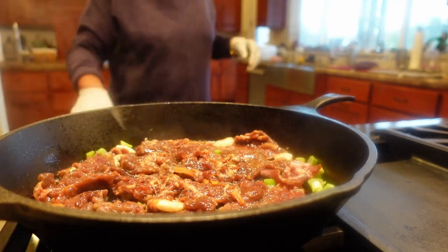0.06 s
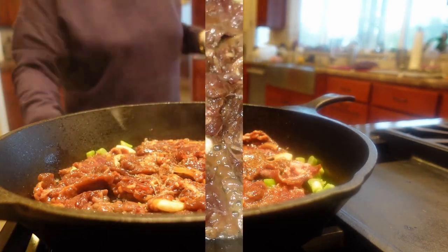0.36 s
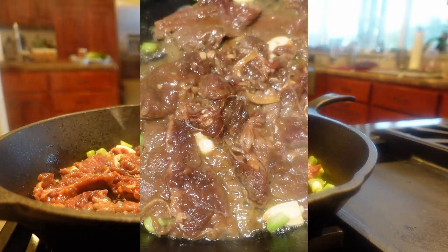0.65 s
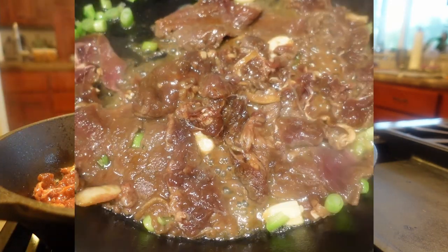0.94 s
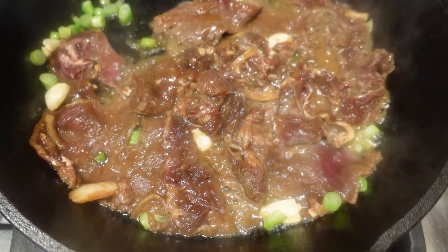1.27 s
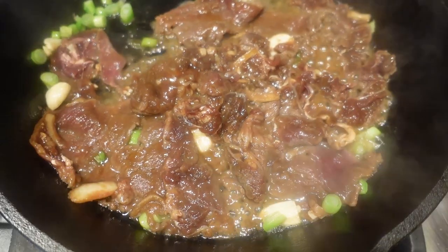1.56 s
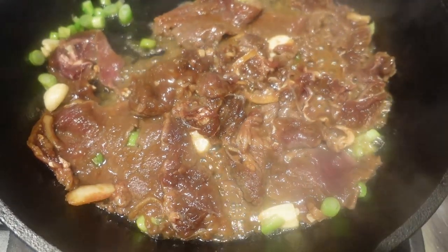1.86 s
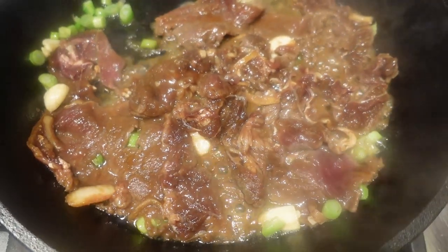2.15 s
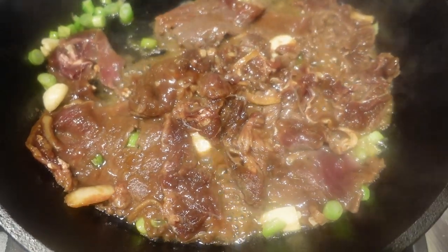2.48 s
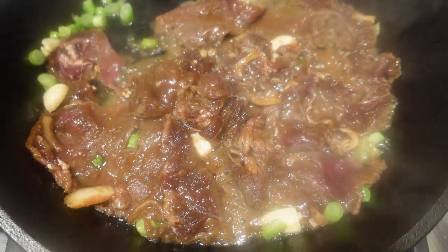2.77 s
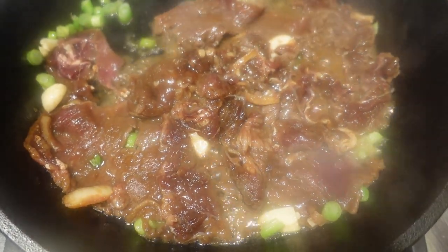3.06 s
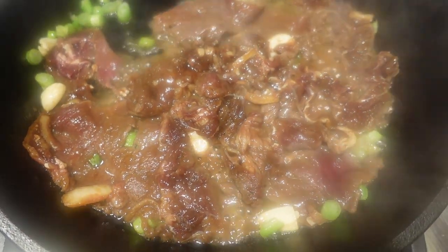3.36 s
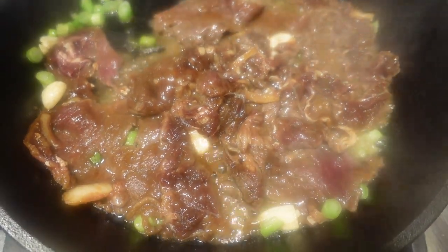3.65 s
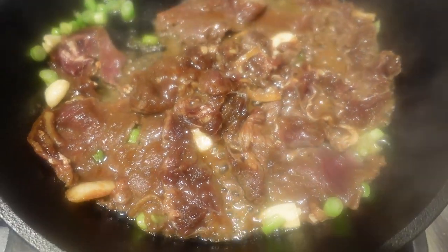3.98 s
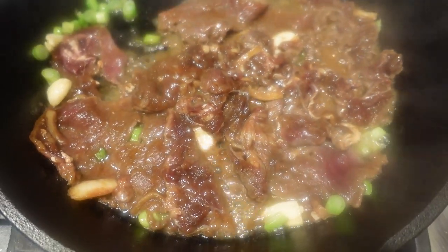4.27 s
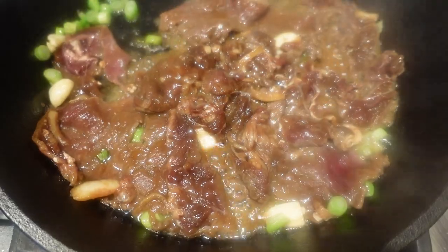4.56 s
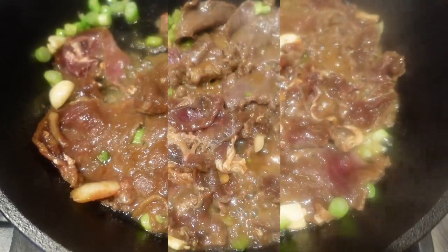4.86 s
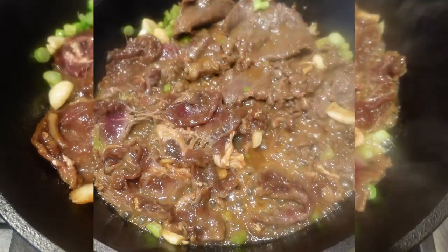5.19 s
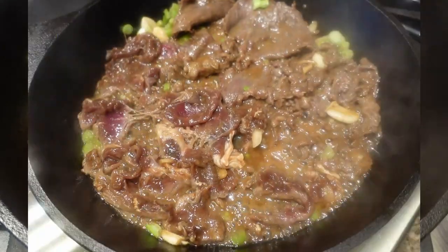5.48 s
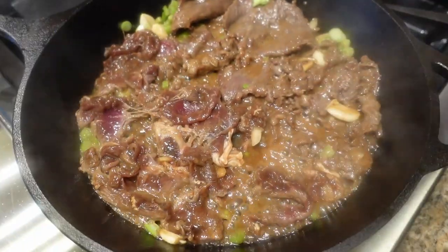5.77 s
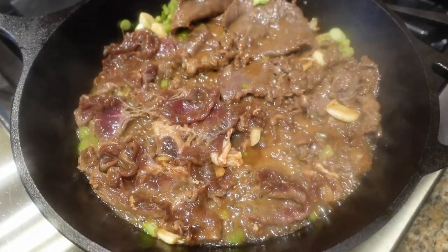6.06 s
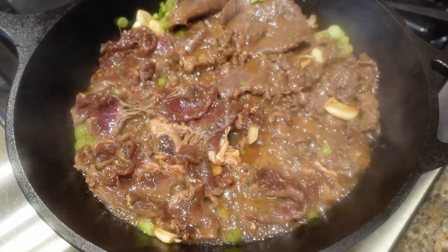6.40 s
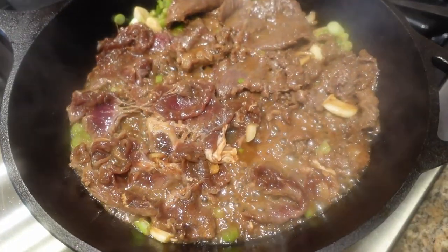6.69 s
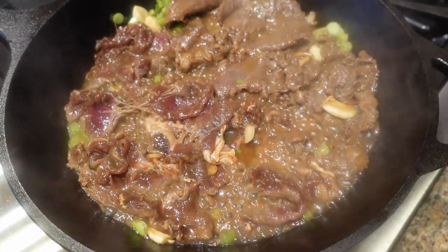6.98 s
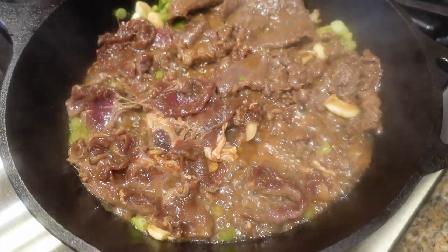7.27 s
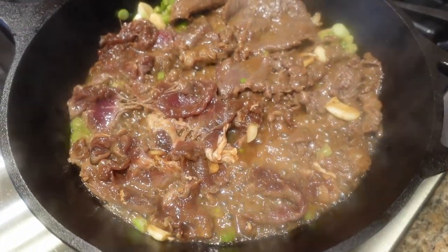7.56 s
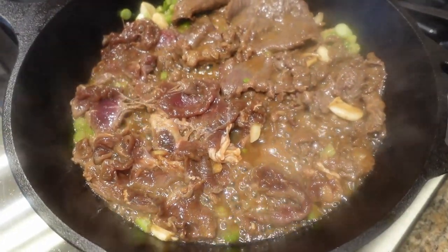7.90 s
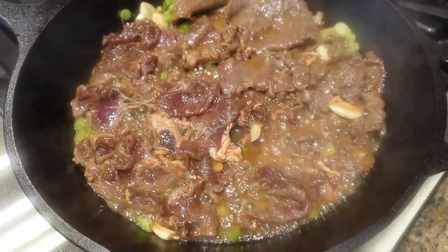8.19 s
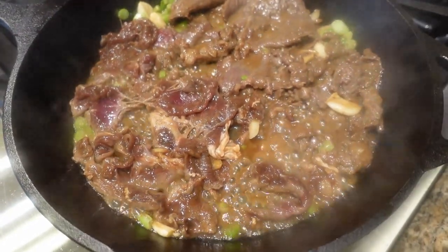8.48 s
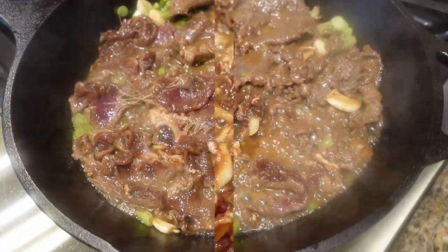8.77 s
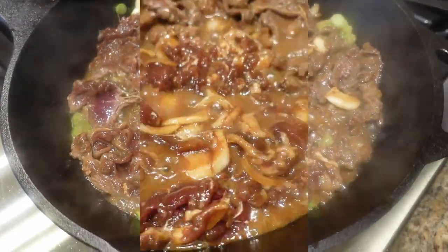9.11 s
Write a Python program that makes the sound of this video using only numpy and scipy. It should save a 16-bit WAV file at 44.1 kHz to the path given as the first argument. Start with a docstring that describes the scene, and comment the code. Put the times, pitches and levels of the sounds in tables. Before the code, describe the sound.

A kitchen vent fan whooshes and hums steadily while saucy meat fries in a pan, fizzing, crackling and softly bubbling.

```python
"""Marinated meat sizzles in a cast iron skillet under a running vent fan.
After a short silence we are suddenly beside the pan: tiny steam bubbles burst in the juice, larger
ones pop, juice spits on the hot iron and the sauce gurgles, while the fan whooshes and hums.
At about 5 s we move above the pan, where the hum is deeper.
In the last moment we jump to a third spot, where the sizzle is duller, and hear one wet splat."""
import sys
import numpy as np
from scipy import signal
from scipy.fft import rfft, irfft
from scipy.io import wavfile

SR = 44100
rng = np.random.default_rng(int(sys.argv[2]) if len(sys.argv) > 2 else 0)


def materialize(psi):
    """Save the field psi as 16-bit PCM at rate SR to the path in sys.argv[1].

    A 1-D psi becomes a single channel; in a 2-D psi each row is a channel.
    """
    bounded = np.clip(np.atleast_2d(psi).T, -1, 1)
    quanta = np.round(bounded * 32767).astype(np.int16)
    wavfile.write(sys.argv[1], SR, quanta)


N = 411940
T = np.arange(N) / SR
HZ = np.fft.rfftfreq(N, 1 / SR)
START_S, MOVE_S, LAST_SPOT_S = 0.8095, 5.147, 9.267
RISE_SAMPLES = 12  # a bubble's lead-in before its peak

# "Beside" and "above" are the two main listening spots; a sound that depends on them has a row for each.
# tone of the sizzle: (frequency [Hz], beside [dB], above [dB])
SIZZLE_TONE = [(40, -50, -50), (200, -14, -25), (606, -6, -2), (1410, -6, 0.8), (2400, -2, -1),
               (3300, -0.5, -2), (3750, -0.5, 0), (4900, -2.5, -4), (5900, -5, -4), (8050, -8.5, -5.5),
               (9900, -13, -12.5), (11900, -18.5, -17.5), (14000, -23.5, -23.5), (15700, -28.5, -26.5)]
# pitches the skillet boosts or weakens: (frequency [Hz], width [Hz], beside [dB], above [dB])
SKILLET_RESONANCES = [(2450, 190, -5, -3.5), (3020, 230, 4, 1.5), (4730, 97, -4, 1.5), (5070, 450, 3, 0.5)]
# slow trend of the frying as juice runs onto the iron: (time [s], vigour [steps])
VIGOUR_TREND = [(0.82, -1), (2.1, 0.5), (2.55, -1.2), (3.7, 0), (4.2, -0.5), (4.42, 1.5), (4.95, -1.5),
                (5.11, 1), (5.19, -3), (5.45, -1), (5.8, -0.9), (6.2, -1), (6.37, -2.5), (6.62, 0),
                (7.2, -1), (7.8, -0.9), (8.0, -0.5), (8.5, -1.7), (9.05, -0.4), (9.18, -4), (9.25, -2.5),
                (9.27, -5), (9.3, 0)]
# rise and fall of the sizzle's treble: (time [s], level [dB])
TREBLE_TREND = [(2.7, -0.3), (4.75, 2.0), (5.6, -0.9), (8.4, 0.5)]
# large bubbles that pop: (time [s], level [dB], pitch [Hz], ring time [ms])
BIG_BUBBLES = [(1.0101, -14.5, 4200, .25), (1.0367, -7.5, 6200, .12), (1.1778, -14, 3030, .5),
               (1.5258, -14, 6200, .15), (1.6378, -17, 7000, .1), (2.2404, -13, 4500, .1),
               (2.6038, -16, 6100, 1.3), (2.9488, -14, 5000, .2), (3.0168, -11, 3500, .25),
               (3.8572, -9.5, 4000, .3), (3.8845, -16, 6500, .14), (4.069, -14, 7500, .08),
               (4.6475, -7.5, 8500, .06), (4.7182, -20, 7000, 1.8), (5.1175, -17, 6000, .7),
               (5.1467, -18, 6300, 1.6), (5.266, -28, 12600, 1.5), (5.4736, -14, 9000, .12),
               (5.4739, -8.5, 2600, .14), (5.6281, -15, 6000, .2), (5.9056, -14, 6550, .15),
               (6.1326, -9, 3780, .7), (6.7749, -13, 7600, .33), (7.3029, -19, 7700, .4),
               (7.5692, -13.5, 5400, .15), (7.6838, -9.5, 4600, .14), (7.6843, -12, 7200, .2),
               (7.7637, -20, 6400, .9), (7.953, -16, 7400, .14), (8.0486, -15, 6700, .3),
               (8.2153, -8, 5900, .33), (8.26, -13, 1900, .1), (8.3485, -19, 11000, .25),
               (8.4141, -9, 5000, .11), (8.6245, -15, 6600, .5), (8.9458, -14, 6700, .18),
               (9.2969, -7.5, 2100, .27), (9.2975, -17, 5200, .25), (9.3025, -17, 2500, .7)]
# juice on bare iron; narrow spits ring: (time [s], level [dB], pitch [Hz], length [s], width [octaves])
JUICE_SPITS = [(1.155, -37, 3030, .07, .13), (1.667, -37, 3030, 0.078, .13), (1.863, -35, 5100, .05, 0.37),
               (2.03, -31, 4400, 0.049, .5), (2.353, -37, 7000, .03, .5), (2.85, -33, 3400, .045, .3),
               (2.987, -33, 3200, 0.05, .3), (3.275, -35, 6000, .03, .4), (3.43, -35, 3680, .07, 0.22),
               (3.817, -34, 4100, .02, .35), (3.854, -32, 4200, .017, .25), (4.28, -36, 3050, .06, .13),
               (4.537, -33, 4500, 0.031, .5), (4.835, -36, 8000, 0.027, .4), (5.018, -36, 4600, .025, .5),
               (5.1, -33, 4800, .036, .45), (6.188, -35, 5200, .03, .5), (6.27, -39, 9000, .035, .4),
               (6.77, -35.5, 7200, .055, .45), (6.94, -35.5, 5500, 0.038, .5), (7.122, -41, 8500, .025, .4),
               (7.548, -34.5, 5000, .03, .5), (7.676, -38, 8500, .025, .55),
               (7.938, -36, 3400, 0.081, 0.61), (8.008, -36, 5500, .05, .6), (8.213, -33, 5200, .04, .6),
               (8.652, -33, 5000, .025, .5), (9.232, -31.5, 4200, 0.029, 0.97), (9.279, -28, 2500, .04, .7),
               (9.289, -34, 5000, 0.027, .2)]
# tone of the bubbles breaking in the sauce: (frequency [Hz], beside [dB], above [dB])
SAUCE_TONE = [(40, -95, -95), (780, -52, -54), (1060, -45, -38.5), (1300, -44, -38), (1560, -50, -35),
              (2020, -57, -36.5), (2370, -60, -42.5), (4000, -75, -68)]
# the sauce wells up: (peak time [s], boost [dB], half-length [s])
SAUCE_GURGLES = [(1.18, 7, .05), (1.775, 13, 0.092), (3.154, 12, .07), (4.813, 12, .07), (5.235, 3.5, .08),
                 (5.48, 3.5, 0.08), (5.83, 6.5, .06), (5.976, 7, .045), (6.47, 5, .04), (6.55, 7, 0.055),
                 (6.62, 6.5, .05), (7.11, 5, 0.055), (7.42, 2.5, .08), (8.09, 4, .08), (8.292, 4, 0.045),
                 (9.055, 3.5, 0.073)]
# duller tone of the sizzle at the last spot: (frequency [Hz], gain [dB])
LAST_SPOT_TONE = [(300, 2), (1200, -14), (2500, -1), (6800, 1), (7600, -6), (14000, -4)]
# air rushing through the fan: (frequency [Hz], beside [dB], above [dB])
AIR_TONE = [(25, -95, -95), (55, -89, -89), (80.5, -67, -67), (112, -68, -67.5), (160, -61.5, -62),
            (333, -69, -67), (490, -62.5, -63.5), (786, -65, -64), (1130, -62.5, -63), (1590, -68.5, -62.5),
            (1940, -68.5, -66.5), (2400, -68, -68.5), (4530, -71, -74), (15200, -100, -100)]
# pitches the hood and stove boost or weaken: (frequency [Hz], width [Hz], beside [dB], above [dB])
HOOD_RESONANCES = [(182, 24, 2, 1.5), (213, 28, -5, -5.5), (257, 65, 3, 1.5), (342, 28, 3, -5.5),
                   (378, 46, -2, -0.5), (466, 20, -1, 0), (508, 31, 2.5, 2.5), (640, 36, 2, 0),
                   (740, 63, -2, -0.5), (856, 51, -2.5, -4), (1070, 92, 2, 3.5), (1500, 160, 5.5, 1.5)]
# tones of the fan's motor and blades: (pitch [Hz], beside [dB], above [dB], waver [0-1])
FAN_TONES = [(120, -48, -39.5, 0.05), (239, -51.5, -55.5, 0.13), (259.5, -54.5, -57, 0.75),
             (282.7, -50, -53, 0.6), (304, -56.5, -61, .4), (359.6, -55.5, -49, 0.07),
             (378.7, -53.5, -56, 0.55), (402.8, -52.5, -49.5, .45), (444.6, -58, -53.5, .5),
             (479.8, -42, -50.5, 0.03), (719.3, -52.5, -50.5, 0.13), (743, -53.5, -58, 0.2)]
# echo off the nearest hard surface, first row beside, second above: (delay [s], level [dB])
NEAR_ECHOES = [(0.0069, -16), (0.00275, -20)]
# share of the sound that differs between left and right: (frequency [Hz], level [dB])
STEREO_WIDTH = [(25, -42), (60, -52), (120, -40), (180, -31), (250, -27.5), (400, -17.5), (700, -16),
                (1500, -15.8), (3000, -13.5), (6000, -11.5), (11500, -8), (13000, -12), (15000, -25)]
# left minus right, as the pan lies a little to the right: (frequency [Hz], beside [dB], above [dB])
STEREO_LEAN = [(250, 0, 0.039), (1000, 0, -0.42), (2500, -1.5, -0.65), (6000, -2, -1), (9000, -1.5, -.5),
               (11500, 0.5, 0), (15000, 0, 0)]


def sizzle(beside_db=-30, above_db=-31):
    """Tiny steam bubbles burst in the juice: a fine fizz, a brighter crackle and a few ticks."""
    vigour = frying_vigour()
    fizz = bursts(per_s=7000, low_hz=404, high_hz=16200, spread=3, ring_ms=0.15, flurry_db=1.5, size=96)
    crackle = bursts(per_s=650, low_hz=2486, high_hz=13990, spread=3, ring_ms=0.86, flurry_db=2.5)
    ticks = bursts(per_s=6, low_hz=5600, high_hz=9300, spread=2, ring_ms=0.55, flurry_db=-3)
    crackle_tone = curves([(1000, -9), (3500, -5), (6000, -2.5), (15000, -2.5)])[0]
    crackle = colour(crackle + amp(-18.5) * ticks, crackle_tone)
    rim_shade = amp([[-3.8], [-1]])  # the rim shades the crackle from the side
    # each step of vigour adds 0.44 dB to the fizz and 2 dB to the crackle
    frying = fizz * amp(0.44 * vigour) + rim_shade * crackle * amp(2 * vigour)
    frying = echo_haze(frying, fade_s=0.069, wet_db=-5)
    frying = colour(frying, curves(SIZZLE_TONE) + resonances(SKILLET_RESONANCES))
    return np.array([unit_level(row) for row in frying]) * amp([[beside_db], [above_db]])


def frying_vigour(dip_steps=0.5, dip_s=0.018):
    """How hard the pan fries, in steps: a slow trend, a random flutter and a brief dip at each pop."""
    trend = np.interp(T, *np.transpose(VIGOUR_TREND))
    flutter = np.outer([0.3, 0.9], drift(rate_hz=7))  # beside, above
    dips = sum((T >= s) * np.exp(-abs(T - s) / dip_s) for s, *_ in BIG_BUBBLES)
    return trend + flutter - dip_steps * dips


def vary_treble(x, corner_hz=9500):
    """The treble slowly rises and falls."""
    treble = colour(x, -10 * np.log10(1 + (corner_hz / (HZ + 1)) ** 10))
    gain = amp(np.interp(T, *np.transpose(TREBLE_TREND)))
    return x + treble * (gain - 1)


def bursts(per_s, low_hz, high_hz, spread, ring_ms, flurry_db, size=600):
    """Bubbles burst at random, each with its own pitch, strength and ring, louder in flurries."""
    flurry = drift(rate_hz=22)
    when, pitch, strength, ring, sign = rng.random((int(per_s * T[-1]), 5)).T[..., None]
    starts = (when * (N - 1)).astype(int)
    hz = low_hz + (high_hz - low_hz) * pitch
    # small bubbles ring higher and shorter
    decay_ms = ring_ms * np.sqrt(high_hz / hz) * 4 ** (2 * ring - 1)
    # many are faint, few are strong
    db = -spread * np.log(0.039 + strength) + flurry_db * np.tanh(flurry[starts])
    bubbles = np.sign(sign - 0.5) * amp(db) / np.sqrt(decay_ms) * bubble(hz, decay_ms, size)
    positions = starts + np.arange(size)
    return unit_level(np.bincount(positions.ravel(), bubbles.ravel(), N)[:N])  # add them all up


def bubble(hz, ring_ms, size=400):
    """A bursting bubble, size samples long: a quick rise, then a ring that dies away."""
    ms = (np.arange(size) - RISE_SAMPLES) / SR * 1000
    rise = -(ms / 0.081) ** 2
    decay = -ms / np.maximum(ring_ms, 0.03)
    return -np.exp(np.where(ms < 0, rise, decay)) * np.cos(2 * np.pi * hz * ms / 1000)


def pops(fade_s=0.09, wet_db=-10.5, lowest_hz=300):
    """Larger bubbles pop, still too small to give bass; stove and hood scatter short echoes back."""
    out, t = np.zeros(N), T[:SR // 8]
    fade = amp(-60 * t / fade_s) * (t > 0.001)
    for s, db, hz, ring_ms in BIG_BUBBLES:
        echoes = amp(wet_db) * unit_level(rng.standard_normal(len(t)) * fade) / np.sqrt(len(t))
        echoes[0] = 1  # the direct sound
        add(out, s - RISE_SAMPLES / SR, amp(db) * signal.fftconvolve(bubble(hz, ring_ms), echoes))
    return signal.sosfilt(signal.butter(2, lowest_hz, "high", fs=SR, output="sos"), out)


def spits(attack_s=0.0037, release_s=0.01, faint_per_s=6, low_hz=3600, high_hz=11500, size=8192):
    """Juice flashes to steam in short, grainy hisses: the listed ones, plus faint ones at random."""
    out, frequencies = np.zeros(N), np.fft.rfftfreq(size, 1 / SR)
    steam = rng.standard_normal(N) * amp(3 * drift(rate_hz=865))
    # same columns as JUICE_SPITS
    faint = [(when * T[-1], -45 - 4 * weak, low_hz * (high_hz / low_hz) ** pitch,
              0.0081 * (0.5 + long), 0.3)
             for when, weak, pitch, long in rng.random((int(faint_per_s * T[-1]), 4))]
    for s, db, hz, length, octaves in JUICE_SPITS + faint:
        puff = steam[min(int(s * SR), N - size):][:size]
        band = amp(-6 * (np.log2((frequencies + 1) / hz) / octaves) ** 2)
        hiss = irfft(rfft(puff) * band)[:int(length * SR)]
        t = T[:len(hiss)]
        shape = np.clip(np.minimum(t / attack_s, (length - t) / release_s), 0, 1)
        add(out, s, amp(db) * unit_level(hiss) * shape)
    return out


def simmer(sink=0.41):
    """Lower, longer-ringing bubbles gurgle in the sauce, which sinks before and after each swell."""
    bubbles = bursts(per_s=380, low_hz=847, high_hz=2233, spread=4.5, ring_ms=3, flurry_db=2, size=900)
    swell_db = np.zeros(N)
    for s, boost_db, half_length in SAUCE_GURGLES:
        offset = (T - s) / half_length
        swell, lull = np.exp(-offset ** 2), np.exp(-(offset / 2) ** 2)
        swell_db += boost_db * (swell - sink * lull) / (1 - sink)
    return colour(bubbles * amp(swell_db), curves(SAUCE_TONE))


def fan_air():
    """Swirling air whooshes through the fan, and the hood shapes its tone."""
    noise = rng.standard_normal(N) * np.sqrt(SR / 2)
    whoosh = colour(noise, curves(AIR_TONE) + resonances(HOOD_RESONANCES))
    return whoosh * amp(0.21 * drift(rate_hz=2.2))


def fan_hum():
    """The fan's motor and blades give wavering tones."""
    out = np.zeros((2, N))
    for hz, beside_db, above_db, waver in FAN_TONES:
        sway = (1 + waver * (drift(2.5) + 1j * drift(2.5))) / np.sqrt(1 + 2 * waver ** 2)
        steady = np.exp(2j * np.pi * (hz * T + rng.random()))
        out += amp([[beside_db], [above_db]]) * np.sqrt(2) * (sway * steady).real
    return out


def echo_haze(x, fade_s, wet_db):
    """Bubbles all over the pan each echo differently, leaving a noisy tail."""
    carry = np.exp(-np.log(1e6) / (fade_s * SR))  # falls 60 dB in fade_s
    power = signal.lfilter([1 - carry], [1, -carry], x ** 2)
    return x + amp(wet_db) * np.sqrt(power) * rng.standard_normal(N)


def near_echo(spots):
    """One quick echo makes the pan sound slightly hollow."""
    return np.array([x + amp(db) * np.roll(x, round(s * SR)) for x, (s, db) in zip(spots, NEAR_ECHOES)])


def kitchen_reflections(x):
    """Reflections from all around reach left and right out of step."""
    spectrum = signal.stft(x, nperseg=512)[2]
    random_phase = np.exp(2j * np.pi * rng.random(spectrum.shape))
    scattered = signal.istft(spectrum * random_phase, nperseg=512)[1][:N]
    late = np.roll(scattered, SR // 250)  # 4 ms behind the direct sound
    return colour(unit_level(late) * np.std(x), curves(STEREO_WIDTH)[0])


def at_listener(spots, blend_s=0.018):
    """Beside the pan at first, then a quick blend to the spot above it."""
    above = np.clip((T - MOVE_S) / blend_s + 0.5, 0, 1)
    return spots[0] * (1 - above) + spots[1] * above


def amp(db):
    """Turns decibels into a gain."""
    return 10 ** (np.asarray(db) / 20)


def unit_level(x):
    """Scales a sound to an average (rms) level of 1."""
    return x / np.sqrt(np.mean(x ** 2) + 1e-20)


def curves(table):
    """Joins a table's points into one dB curve over frequency for each level column."""
    hz, *columns = np.transpose(table)
    return np.array([np.interp(np.log(HZ + 1), np.log(hz + 1), db) for db in columns])


def resonances(table):
    """Bell-shaped peaks and dips in dB, one curve for each main spot."""
    return sum(np.outer(db, np.exp(-2 * ((HZ - hz) / width) ** 2)) for hz, width, *db in table)


def colour(x, db):
    """Turns each frequency up or down along a dB curve."""
    return irfft(rfft(x) * amp(db), N)


def drift(rate_hz):
    """A random wander with a typical size of 1."""
    points = rng.standard_normal(N // 64)
    return unit_level(np.interp(T * 2 * rate_hz, np.arange(len(points)), points))


def add(mix, s, sound):
    """Mixes a sound in at s seconds."""
    part = mix[round(s * SR):][:len(sound)]
    part += sound[:len(part)]


def scene():
    """Pan and fan together, spread left and right by the kitchen; the hum stays in the middle."""
    pan = at_listener(near_echo(vary_treble(sizzle()) + simmer()))
    pan = np.where(T < LAST_SPOT_S, pan, colour(pan, curves(LAST_SPOT_TONE)[0]))
    direct = at_listener(fan_air()) + pan + pops() + spits()
    reflected, lean_db = kitchen_reflections(direct), curves(STEREO_LEAN)
    left = at_listener(colour(direct + reflected, lean_db / 2))
    right = at_listener(colour(direct - reflected, -lean_db / 2))
    return np.array([left, right]) + at_listener(fan_hum())


def record(dry):
    """The sound starts suddenly out of silence, and its highest treble is removed."""
    lowpass = signal.firwin(511, cutoff=15650, window=("kaiser", 9), fs=SR)
    return signal.oaconvolve(dry * (T >= START_S), lowpass[None], "same")


dry = scene()
out = record(dry)
materialize(out)
```